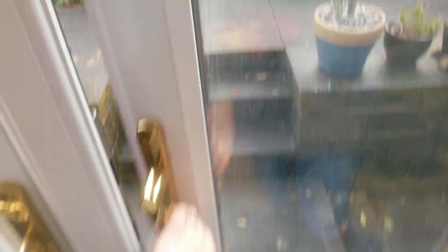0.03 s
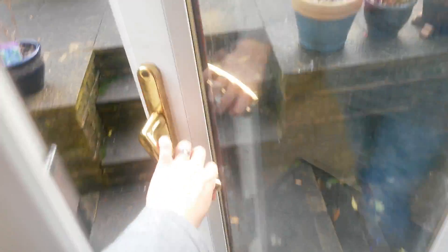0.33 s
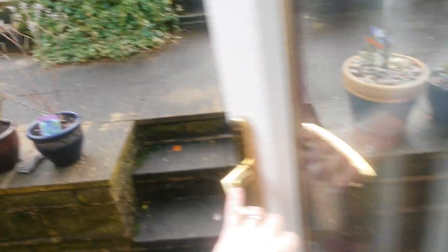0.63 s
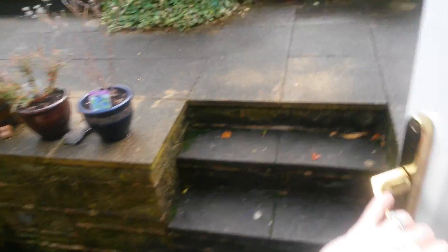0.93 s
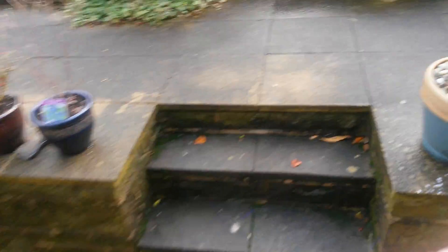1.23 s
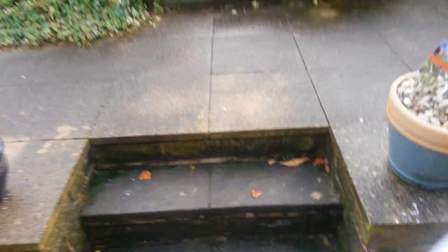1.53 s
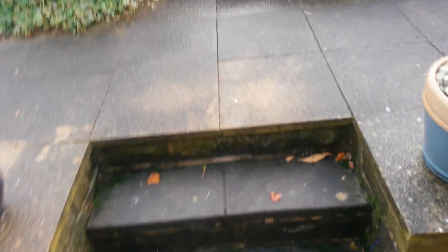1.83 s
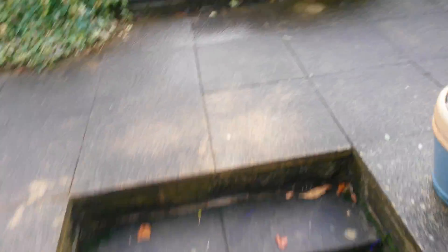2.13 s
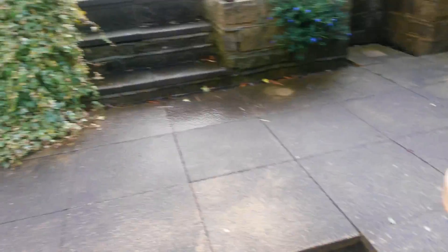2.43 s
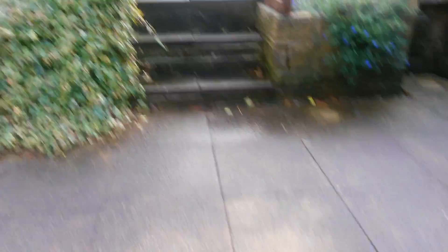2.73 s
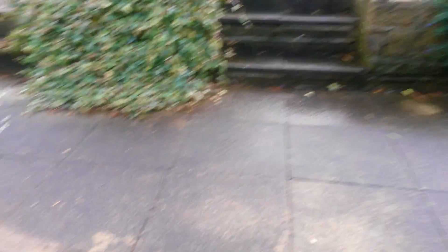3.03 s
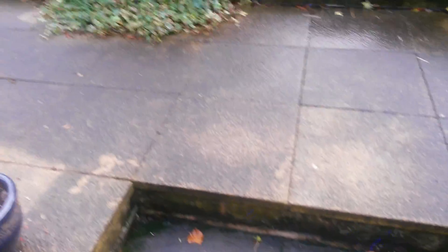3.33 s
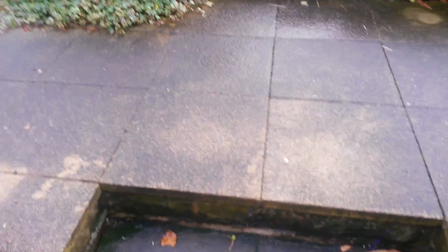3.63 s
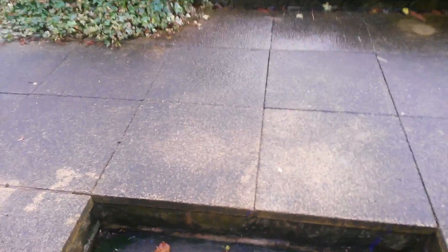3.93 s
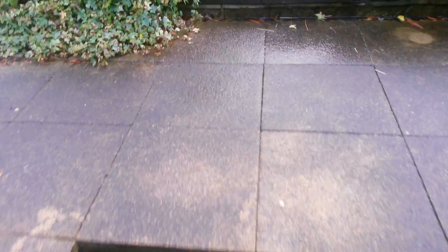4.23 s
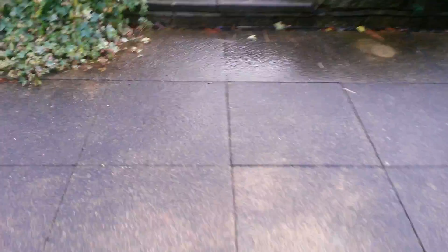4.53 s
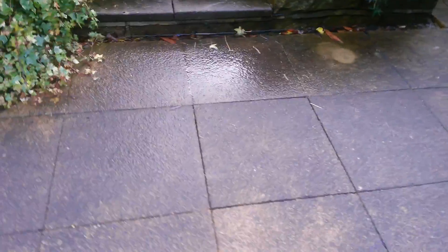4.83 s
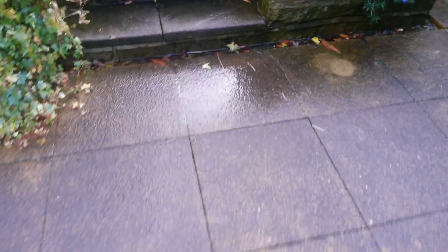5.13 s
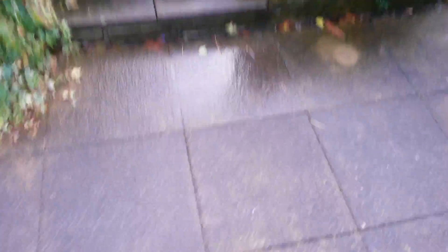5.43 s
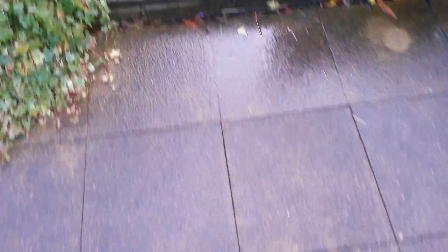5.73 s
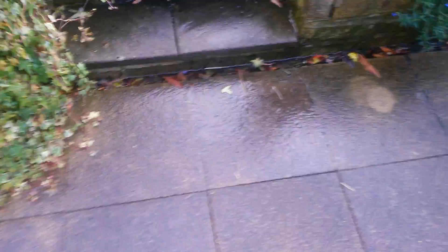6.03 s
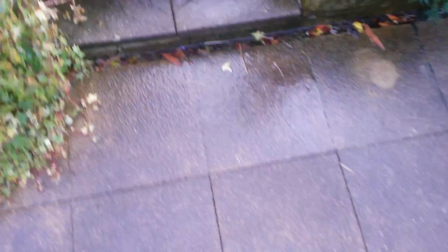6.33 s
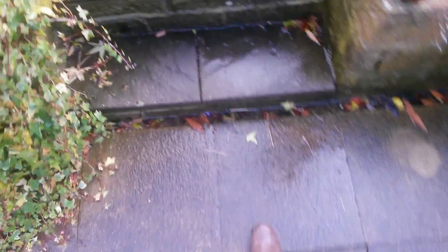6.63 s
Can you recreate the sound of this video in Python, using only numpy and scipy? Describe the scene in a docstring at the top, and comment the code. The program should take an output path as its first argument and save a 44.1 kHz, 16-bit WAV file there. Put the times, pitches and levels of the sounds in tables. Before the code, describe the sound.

A faint hiss of drizzle and rustling clothes fades in at about half a second, over a low distant rumble. A glass patio door opens with a faint squeak and soft bumps, and quiet footsteps pad onto wet paving until about 2 seconds, with a few small drop ticks. At about 3.2 seconds the door bangs shut behind the microphone, by far the loudest sound: the latch snaps, the panel booms and the rubber seal thuds, with a short outdoor echo. The metal latch and handle clack and rattle, dying away by about 4.2 seconds. Soft footsteps resume from 4.4 seconds until the end, near 7 seconds, with gritty scuffs, sleeve brushes and faint squeaks of wet soles. Two raindrops click sharply on the microphone, toward the left, at about 4.6 and 5.4 seconds. The light rain continues underneath.

```python
"""Someone steps out through a glass patio door onto wet paving in light rain, holding a camera.
First a faint hiss of drizzle and clothes fades in, the door swings open, and feet pad outside.
About three seconds in, the door bangs shut: the latch snaps, the panel booms, the rubber seal thuds.
For the next second the metal latch and handle clack and rattle as they settle.
Then come more soft steps, scuffs and squeaks of wet soles, while a few drops tick on the camera."""
import sys
import numpy as np
from scipy import signal
from scipy.fft import rfft, irfft
from scipy.io import wavfile
from scipy.ndimage import uniform_filter1d

SR = 44100
rng = np.random.default_rng(int(sys.argv[2]) if len(sys.argv) > 2 else 0)


def unload_audio(sound):
    """Save the sound as a 16-bit wav file, at the path given as the first command line argument."""
    columns = np.transpose(np.atleast_2d(sound))
    # keep every value between -1 and 1, then stretch to whole-number steps
    steps = np.round(np.clip(columns, -1, 1) * 32767)
    wavfile.write(sys.argv[1], SR, steps.astype(np.int16))


N = 298998
TIME = np.arange(N) / SR

# the door opening, then slamming and shaking: (time [s], level [dB], treble limit [Hz])
DOOR_BLOWS = [(0.71, -43, 646), (0.7182, -36, 280), (0.737, -31.5, 140), (1.359, -30.5, 263),
              (3.181, -30, 1740), (3.226, -26, 975), (3.2515, -14, 3730), (3.28, -12.5, 90),
              (3.3, -24.5, 300), (3.332, -24.5, 1510), (3.364, -30.5, 1900), (3.417, -41, 1100),
              (3.486, -32.5, 995), (3.514, -24.5, 152), (3.562, -42, 254), (3.606, -38, 263),
              (3.629, -47, 900)]
# the notes of the door panel and its glass: (pitch [Hz], level [dB], ring time [s])
PANEL_NOTES = [(28, -23, 0.37), (65.8, -13, 0.16), (109.2, 1, 0.15), (136.6, -20, 0.14), (182, -4, 0.22),
               (201.3, -15, 0.26), (247.2, -18.5, 0.65), (255, -17, 0.19), (328, -18, 0.77),
               (354, -6.5, 0.085), (468, -19.5, 0.54), (557, -26, 0.94), (646, 2, 0.054), (828, -25, 0.47),
               (849, -6.5, 0.26), (940, -14.5, 0.44), (1102, -12, 0.12), (1103, -17, 0.57),
               (1224, -10, 0.12), (1284, -21, 0.48), (1550, -12, 0.32), (1700, -31, 0.46)]
# the frame's many small vibrations, heard as noise: (frequency [Hz], level [dB])
FRAME_COLOUR = [(20, -22), (50, -24), (115, -3), (190, 0), (270, -0.5), (380, -4), (700, -3.5), (1200, -12),
                (2500, -11), (8000, -8), (15000, -37)]
def door(panel_db=-6, frame_db=-1, slam_ring_s=0.36, half_ring_db=34):
    """Each blow makes the panel boom and the frame shake; harder blows shake the frame longer."""
    out, t = np.zeros((2, N)), TIME[:SR]
    hardest_db = max(row[1] for row in DOOR_BLOWS)
    for s, db, treble_hz in DOOR_BLOWS:
        ring_s = slam_ring_s * 2 ** ((db - hardest_db) / half_ring_db)
        panel = amp(panel_db) * ring(PANEL_NOTES, t, path_s=0.00023)
        frame = amp(frame_db) * noise(FRAME_COLOUR, SR) * fade(t, ring_s)
        blow = (panel + frame) * (1 - fade(t, 0.012))
        add(out, s, amp(db) * cut_treble(blow, treble_hz, order=2))
    return out + amp(-11) * yard_echo(out)


# the door pressing into its seal: (time [s], level [dB], pitch [Hz], time to peak [cycles])
SEAL_THUDS = [(3.189, -34.5, 322, 1.7), (3.253, -14.5, 364, 0.46), (3.255, -15.5, 115, 0.7),
              (3.28, -29, 42, .6), (3.3, -20.5, 148, 0.6), (3.351, -33, 32, 0.53), (3.511, -36, 62, .9)]
def rubber_seal():
    """The rubber seal catches the closing door with dull thuds."""
    out = np.zeros((2, N))
    for s, db, hz, cycles in SEAL_THUDS:
        add(out, s, amp(db) * thump(hz, ring_s=0.16, rumble_db=-6.5, cycles=cycles))
    return out + amp(-17) * yard_echo(out)


# the notes of the hollow frame: (pitch [Hz], level [dB], ring time [s])
FRAME_NOTES = [(490, -1, 0.077), (548, 1, 0.042), (1017, -14, 0.055), (1385, -4, 0.024)]
def frame_knock(at_s=3.1825, level_db=-24):
    """The door's edge knocks on the hollow frame just before the slam."""
    out, t = np.zeros((2, N)), TIME[:SR // 4]
    knock = ring(FRAME_NOTES, t, path_s=0.00047) * (1 - fade(t, 0.0066))
    add(out, at_s, amp(level_db) * cut_treble(knock, 2500, order=2))
    return out + amp(-14) * yard_echo(out)


BOLT_S = 3.235
def latch_bolt(width_hz=2600):
    """The springy bolt hits its metal catch: a bright snap and a lower, longer ring."""
    out, t = np.zeros((2, N)), TIME[:SR // 10]
    for db, hz, ring_s in [(-21, 8400, 0.003), (-28, 2900, 0.12)]:
        metal = note_clusters([(hz, width_hz, 0)], len(t), vary_db=0)
        add(out, BOLT_S, amp(db) * metal * fade(t, ring_s))
    return out


# latch and handle hits: (time [s], level [dB], treble limit [Hz], bounce compared with hit [dB],
# rise time [s], boosted pitch [Hz])
LOCK_HITS = [(3.236, -30, 11200, -1, 0.0017, 7500), (3.2534, -21.5, 14400, -13, 0.0048, 7600),
             (3.291, -17, 8400, -8, 0.002, 6500), (3.3328, -31, 12500, 6.5, 0.0023, 7600),
             (3.3707, -15.5, 5900, 3, 0.0024, 4250), (3.4164, -22, 6300, 5.5, 0.0043, 6400),
             (3.484, -26.5, 6470, 6.5, 0.0031, 4200), (3.511, -28, 6750, 3.5, 0.0022, 4330),
             (3.5203, -29, 9400, 0, 0.00093, 7600), (3.543, -34.5, 6100, 6, 0.0025, 5370),
             (3.5534, -32.5, 6200, 5.5, .002, 4370), (3.6087, -44, 7700, -11, .001, 5340),
             (3.628, -32, 8600, -3, 0.0022, 5450), (3.7086, -42, 8640, -6, 0.0019, 6500),
             (3.745, -19, 8070, -5.5, 0.0015, 4750), (3.765, -31, 8000, -11, 0.0023, 6900),
             (3.814, -37, 8650, -4, 0.003, 6740), (3.8378, -23, 8600, -3, .002, 6500),
             (3.857, -34.5, 7700, -4, .002, 6500), (3.875, -42.5, 8350, -1, .002, 7450),
             (3.902, -46, 8100, -2, .002, 4400), (3.932, -49.5, 8900, -11, .002, 7600),
             (3.945, -51.5, 9700, -13, 0.00086, 7600), (4.1444, -39, 9900, 1, 0.0016, 7500),
             (4.1822, -37.5, 6600, 3, 0.0014, 4550), (4.199, -37, 9500, -6, 0.0023, 7500),
             (4.217, -36.5, 7900, -1.5, 0.0024, 7550)]
# the handle's spring being let go: (time [s], level [dB])
SPRING_RELEASES = [(3.747, -46), (3.838, -46.5), (4.149, -58.5), (4.199, -57.5)]
# the low notes of the spring and the panel that holds it: (pitch [Hz], level [dB], ring time [s])
SPRING_NOTES = [(65, -6, .7), (178, 0, 0.55), (189, -8, 0.4), (234, -6, 0.33), (328, -8, .4),
                (458, -12, .45)]
def lock_rattle(clack_ring_s=0.077, chatter_s=0.37, settle_s=0.021, bounce_s=0.0105, echo_s=0.015):
    """Each clack is followed by a duller bounce and an echo off the wall; the handle's spring hums."""
    out = np.zeros((2, N))
    for s, db, treble_hz, bounce_db, rise_s, boost_hz in LOCK_HITS:
        # hits close to the bolt's snap ring longer
        ring_s = clack_ring_s + chatter_s * np.exp(-abs(s - BOLT_S) / settle_s)
        hit = amp(db) * clack(treble_hz, ring_s, rise_s, boost_hz)
        bounce = clack(0.52 * treble_hz, ring_s, rise_s, boost_hz=3190, bite_db=-7.5)
        add(out, s, hit)
        add(out, s + bounce_s, amp(db + bounce_db) * bounce)
        add(out, s + echo_s, amp(-15) * hit[::-1])  # left and right swap
    for s, db in SPRING_RELEASES:
        add(out, s, amp(db) * ring(SPRING_NOTES, TIME[:SR]))
    return out + amp(-12) * yard_echo(out)


# the crack of the lock's case: (frequency [Hz], level [dB])
CASE_COLOUR = [(60, -37), (250, -14.5), (900, -7), (2000, -6), (2900, -12.5), (3700, -3), (4600, -4),
               (5700, -0.5), (6400, 2), (7800, 1), (9200, -3.5), (11000, -6.5), (14500, -16)]
# bunches of close notes in the lock's metal parts: (centre [Hz], width [Hz], level [dB])
METAL_CLUSTERS = [(2450, 130, -7.5), (2737, 240, -2), (3270, 510, -4), (3740, 200, -3), (4297, 215, 4),
                  (4530, 110, -0.5), (4850, 320, -1.5), (5220, 450, -2.5), (6324, 230, 5.5),
                  (6850, 400, -7), (7510, 270, 4.5), (8740, 220, 4), (10060, 400, -5)]
# the handle's clear notes: (pitch [Hz], level [dB], ring time [s])
HANDLE_NOTES = [(2270, -11, 0.3), (2730, -14.5, 0.22), (3210, -8.5, 0.14), (3850, -11, 0.22),
                (4190, -2, 0.27), (4440, -3.5, 0.3), (4600, -4, 0.2), (5350, -8.5, 0.4),
                (6150, -10.5, 0.17), (7470, -13, 0.22)]
def clack(treble_hz, ring_s, rise_s, boost_hz, bite_db=-2, bite_s=0.0059):
    """Metal parts collide in the lock: a rough crack, a brief chime and the handle's clear notes."""
    t = TIME[:SR // 3]
    crack = amp(-7) * noise(CASE_COLOUR, len(t)) * fade(t, ring_s)
    # the parts stay pressed together, so most of the chime dies with the crack
    chime_fade = amp(-5.5) * fade(t, ring_s) + amp(-19) * fade(t, 0.17)
    chime = note_clusters(METAL_CLUSTERS, len(t), vary_db=2.9, boost_hz=boost_hz) * chime_fade
    bite = 1 + amp(bite_db) * np.exp(-((t - rise_s) / bite_s) ** 2)  # a louder start
    chatter = roughness(len(t), depth_db=1.15, grain_samples=36)
    handle = amp(-23) * ring(HANDLE_NOTES, t, path_s=0.000475)
    hit = ((crack + chime) * bite * chatter + handle) * np.minimum(t / rise_s, 1)
    return cut_treble(hit, treble_hz, order=5)


def note_clusters(peaks, size, vary_db, boost_hz=0, boost_db=5, boost_width_hz=450):
    """Struck metal rings at many close pitches; each bunch's level varies by about vary_db."""
    hz = np.fft.rfftfreq(size, 1 / SR)
    power = 0
    for centre, width, db in peaks:
        strength = amp(db + vary_db * rng.standard_normal())
        power += (strength / (1 + ((hz - centre) / width * 2) ** 2)) ** 2
    boost = amp(boost_db * np.exp(-((hz - boost_hz) / boost_width_hz) ** 2))
    white = rfft(rng.standard_normal((2, size)))
    return unit(irfft(white * np.sqrt(power) * boost, size))


# feet landing: (time [s], thump level [dB], pitch [Hz], heel click [dB], grit [dB],
# toe compared with heel [dB])
FOOTFALLS = [(.709, -39.5, 550, -68, -61, -15), (1.248, -45.5, 455, -53, -58, -9),
             (1.295, -48, 387, -67, -60, -0.5), (1.357, -34, 126, -52, -68, -4),
             (1.384, -44, 400, -73, -72, -15), (1.432, -27.5, 383, -58, -70, -7),
             (1.453, -39.5, 540, -58, -67, -22), (1.572, -40.5, 295, -54, -60, -0.5),
             (1.916, -40, 254, -58.5, -62, -11), (2.029, -44, 506, -77, -81, 2.5),
             (4.4015, -35, 410, -57, -63, -5), (5.01, -42.5, 93, -74, -69, -13),
             (5.267, -26, 435, -64, -53, -18), (5.82, -45.5, 69.5, -75, -69, -8),
             (5.9143, -40.5, 373, -56, -67, -18), (5.9295, -43, 252, -51, -51.5, -1.5),
             (6.59, -42.5, 149, -65, -61, -7)]
# wet soles pressing flat: (time [s], level [dB], pitch [Hz])
SOLE_SQUASHES = [(4.403, -39, 164), (5.273, -31, 186), (5.2785, -34, 440), (5.9442, -36, 282),
                 (6.688, -47, 230)]
def footsteps(grit_delay_s=0.0058, toe_delay_s=0.017, toe_pitch_ratio=0.68):
    """The heel lands with a click, grit slides under the sole, and the foot rolls onto its toe."""
    out = np.zeros((2, N))
    for s, db, hz, click_db, grit_db, toe_db in FOOTFALLS:
        add(out, s, amp(db) * thump(hz, ring_s=0.078))
        add(out, s, amp(click_db) * rub(length_s=0.0045, centre_hz=4730, scrape_db=1.5))
        add(out, s + grit_delay_s, amp(grit_db) * rub(length_s=0.03, centre_hz=6500, scrape_db=-6))
        add(out, s + toe_delay_s, amp(db + toe_db) * thump(toe_pitch_ratio * hz, ring_s=0.11))
    for s, db, hz in SOLE_SQUASHES:
        add(out, s, amp(db) * thump(hz, ring_s=0.11))
    return out + amp(-17) * yard_echo(out)


def thump(hz, ring_s, rumble_db=-9, cycles=0.45):
    """A soft bump gives a quick push of air and a short rumble around the same pitch."""
    t = TIME[:SR // 2]
    age = t * hz / cycles
    push = -age * np.exp(1 - age ** 1.01) * np.sin(2 * np.pi * hz * t)
    rumble = noise([(hz / 5, -9), (hz, 0), (hz * 1.05, -5), (hz * 4, -25), (15000, -55)], len(t))
    return push + amp(rumble_db) * rumble * fade(t, ring_s) * (1 - fade(t, 0.0078))


# drops on the camera: (time [s], click level [dB], knock level [dB], left over right [dB])
DROP_HITS = [(0.752, -28.5, -43, 3), (0.815, -36, -58, 11), (1.525, -32, -36, 2), (1.7673, -27.5, -34, 2),
             (2.389, -29.5, -66, 16), (4.572, -12.5, -32, 13), (5.3905, -11, -35.5, 16.5),
             (5.495, -40, -35.5, 16)]
# the notes of the camera's shell: (pitch [Hz], level [dB], ring time [s])
SHELL_NOTES = [(780, -10, .011), (1150, -3, .01), (1800, -1, .008)]
def camera_drops(click_hz=6800, click_ring_s=0.0008):
    """A raindrop hits the camera: a dry click and a brief hollow knock from the shell."""
    out, t = np.zeros((2, N)), TIME[:SR // 20]
    for s, click_db, knock_db, side_db in DROP_HITS:
        click = cut_bass(ring([(click_hz, click_db, click_ring_s)], t), 3800, order=2)
        knock = cut_bass(amp(knock_db) * ring(SHELL_NOTES, t), 550, order=2)
        add(out, s, pan(side_db) * cut_treble(click + knock, 10500, order=4))
    return out


# strokes of soles and sleeves: (time [s], length [s], level [dB], scrape compared with swish [dB],
# left over right [dB], swish centre [Hz])
SCUFF_STROKES = [(1.452, 0.0026, -56, 8, 0, 5000), (1.763, 0.082, -55.5, -0.5, 0, 6530),
                 (2.374, 0.15, -62.5, -19, -3, 6900), (2.736, 0.28, -58, -11, -3, 6160),
                 (4.538, 0.02, -48.5, -24, -1, 6700), (4.608, 0.065, -51.5, -4.5, 1.5, 6500),
                 (5.277, 0.026, -41.5, -19, 0, 5330), (5.2783, 0.0017, -59, 7, 5, 5000),
                 (5.315, 0.032, -53, -25, -5, 7000), (5.334, 0.025, -45.5, -31, -11, 7600),
                 (5.373, 0.024, -44, -11, -9, 6200), (5.417, 0.0058, -51, -27, -12, 8400),
                 (5.453, 0.026, -49.5, -16, -21.5, 8100), (5.478, 0.03, -46.5, -7.5, -17, 7900),
                 (5.527, 0.045, -55, 1.5, -1, 5000), (5.58, 0.0035, -53, -1, -9, 5200),
                 (5.936, .004, -49, 3.5, -3, 5000), (6.193, 0.0042, -51.5, -6, 0, 4600),
                 (6.292, 0.0089, -53, -1, 2.5, 3600), (6.62, 0.051, -45, -5, -2, 6760),
                 (6.642, 0.048, -40, -5, -3, 6900), (6.7, 0.021, -45.5, -3.5, -4, 6500)]
def scuffs():
    """Soles drag and sleeves brush around the camera."""
    out = np.zeros((2, N))
    for s, length_s, db, scrape_db, side_db, centre_hz in SCUFF_STROKES:
        add(out, s, amp(db) * pan(side_db) * rub(length_s, centre_hz, scrape_db))
    return out


# the high swish of rubbing: (frequency [times the centre], level [dB])
SWISH_COLOUR = [(.03, -42.5), (.35, 1), (.5, 6), (.68, 9.5), (1.2, 10), (1.7, 1), (2.6, -18)]
# the lower scrape under it: (frequency [Hz], level [dB])
SCRAPE_COLOUR = [(60, 1), (250, 11), (520, 6), (750, 4), (1000, 5), (1500, 7), (3000, 2), (8000, -57)]
def rub(length_s, centre_hz, scrape_db):
    """Gritty rubbing that catches quickly and slides to a stop."""
    t = TIME[:SR // 2]
    grit = roughness(len(t), depth_db=1, grain_samples=40)
    swish = noise([(ratio * centre_hz, db) for ratio, db in SWISH_COLOUR], len(t))
    scrape = amp(scrape_db) * noise(SCRAPE_COLOUR, len(t))
    stroke = (1 - fade(t, 0.047 * length_s)) * np.exp(-(t / length_s) ** 2)
    return (swish + scrape) * grit * stroke


# faint squeaks of the door seal and wet soles: (time [s], length [s], level [dB], first pitch [Hz],
# middle pitch [Hz], last pitch [Hz], width [Hz])
SQUEAK_GLIDES = [(0.48, 0.6, -67.5, 1317, 1350, 1453, 220), (1.56, 0.071, -62.5, 2410, 2310, 2090, 300),
                 (4.872, 0.07, -59.5, 2270, 2610, 1950, 150), (6.29, 0.125, -58.5, 1680, 1593, 910, 523),
                 (6.615, .05, -47, 574, 495, 590, 202), (6.649, 0.055, -47.5, 790, 1040, 980, 380)]
def squeaks():
    """Rubbing makes one breathy note that slides along a curve through three pitches."""
    out = np.zeros((2, N))
    for s, length_s, db, *pitches, width_hz in SQUEAK_GLIDES:
        progress = np.linspace(0, 1, round(length_s * SR))
        hz = np.polyval(np.polyfit([0, .5, 1], pitches, 2), progress)
        flutter = cut_treble(rng.standard_normal((2, len(progress))), width_hz / 2, order=2)
        phase = 2 * np.pi * np.cumsum(hz) / SR
        note = unit(flutter[0] * np.cos(phase) + flutter[1] * np.sin(phase))
        add(out, s, amp(db) * note * np.sin(np.pi * progress))
    return out


# the far rumble: (frequency [Hz], level [dB])
RUMBLE_COLOUR = [(20, -7), (45, -7), (66, 6.5), (95, -4.5), (170, -6.5), (350, -10), (600, -15.5),
                 (1200, -24), (3000, -34.5)]
# the background hiss of drizzle and rustling clothes: (frequency [Hz], level [dB])
HISS_COLOUR = [(100, -41), (700, 3.5), (1500, 3), (2500, 3.5), (4400, 3), (6000, 3.5), (8000, 4),
               (9500, -1), (12000, 0.5), (14500, -7)]
# the rumble's loudness, in one list before the slam and one after: (time [s], relative level [dB])
RUMBLE_LEVELS = [
    [(0.55, -69), (0.76, -61), (2.36, -60), (3.12, -60)],
    [(4.0, -63.5), (5.64, -60), (6.49, -65.5), (6.78, -56)],
]
# the same for the hiss, swelling with movement and dipping after the slam: (time [s], relative level [dB])
HISS_LEVELS = [
    [(0.55, -70), (0.61, -66.5), (0.82, -60.5), (1.08, -62.5), (1.2, -66), (1.29, -64), (1.42, -60.5),
     (1.6, -59), (1.7, -66), (1.96, -65.5), (2.18, -64.5), (2.32, -63), (3.12, -65)],
    [(4.0, -65.5), (4.35, -67), (4.46, -65.5), (4.73, -63), (5.15, -61.5), (5.26, -65), (5.4, -59),
     (5.54, -58), (5.73, -59.5), (5.8, -63), (5.89, -65), (5.98, -61), (6.14, -66.5), (6.22, -62.5),
     (6.36, -64), (6.45, -68), (6.55, -62.5), (6.78, -60)],
]
def background(rumble_db=2, hiss_db=5, patter_db=-17, drops_per_s=60, waver_db=1.37):
    """A far rumble, the hiss of drizzle and rustling clothes, and fine drops landing on the stone."""
    rumble_gain = amp(rumble_db + np.interp(TIME, *np.concatenate(RUMBLE_LEVELS).T))
    hiss_gain = amp(hiss_db + np.interp(TIME, *np.concatenate(HISS_LEVELS).T))
    rumble = noise(RUMBLE_COLOUR, N)
    landings = (rng.random((2, N)) < drops_per_s / SR) * rng.exponential(1, (2, N))
    splash = noise(HISS_COLOUR, 512) * fade(TIME[:512], .008)
    patter = unit(signal.oaconvolve(landings, splash, axes=1)[:, :N])
    hiss = (noise(HISS_COLOUR, N) + amp(patter_db) * patter) * amp(waver_db * waver(top_hz=22))
    return rumble * rumble_gain + hiss * hiss_gain


# how long the yard echoes: (frequency [Hz], ring time [s])
ECHO_TIMES = [(60, 0.49), (250, 0.58), (1000, 0.41), (4000, 0.12), (8000, 0.26), (14000, 0.2)]
def yard_echo(x):
    """Sound bounces off the house wall, steps and paving; the treble dies before the bass."""
    hz, t, bands = signal.stft(noise([(20, 0), (15000, 0)], SR), SR, nperseg=256)
    bands = bands * fade(t, look_up(ECHO_TIMES, hz)[:, None]) * (1 - fade(t, 0.026))
    tail = signal.istft(bands, SR, nperseg=256)[1]
    return signal.fftconvolve(x, tail / np.linalg.norm(tail[0]), axes=1)[:, :N]


# how alike the left and right sides are: (frequency [Hz], likeness [-1 to 1])
SIDE_LIKENESS = [(60, 0.88), (350, 0.89), (750, 0.39), (1500, -0.18), (3000, 0.046), (14000, -0.096)]
def noise(colour, size):
    """Stereo noise, alike on both sides in the bass; its colour sets the level at each frequency."""
    hz = np.fft.rfftfreq(size, 1 / SR)
    a, b = rfft(rng.standard_normal((2, size)))
    same = look_up(SIDE_LIKENESS, hz)
    mid, side = a * np.sqrt(1 + same), b * np.sqrt(1 - same)
    return unit(irfft(np.array([mid + side, mid - side]) * amp(look_up(colour, hz)), size))


def ring(notes, t, path_s=0):
    """Fading notes of a struck object; each reaches the two ears up to path_s apart."""
    return sum(amp(db) * fade(t, ring_s) * np.sin(2 * np.pi * hz * (t + path_s * rng.random((2, 1))))
               for hz, db, ring_s in notes)


def roughness(size, depth_db, grain_samples):
    """A fast random flicker in loudness."""
    return amp(depth_db * unit(uniform_filter1d(rng.standard_normal(size), grain_samples)))


def waver(top_hz):
    """A slow random drift."""
    hz = np.fft.rfftfreq(N, 1 / SR)
    return unit(irfft(rfft(rng.standard_normal(N)) * np.exp(-(hz / top_hz) ** 2), N))


def fade(t, ring_s):
    """Falls by 60 dB in the ring time."""
    return np.exp(-np.log(1000) * t / ring_s)


def cut_treble(x, hz, order):
    """A softer hit makes less treble."""
    return signal.sosfilt(signal.butter(order, hz, fs=SR, output="sos"), x)


def cut_bass(x, hz, order):
    """Small things give off little bass."""
    return signal.sosfilt(signal.butter(order, hz, "high", fs=SR, output="sos"), x)


def amp(db):
    """Turns decibels into a multiplier."""
    return 10 ** (np.asarray(db) / 20)


def unit(x):
    """Scales to an average strength (rms) of 1."""
    return x / np.sqrt(np.mean(x ** 2) + 1e-20)


def look_up(points, hz):
    """Reads between (frequency, value) points, with octaves evenly spaced."""
    known_hz, values = np.transpose(points)
    return np.interp(np.log(hz + 1), np.log(known_hz + 1), values)


def add(mix, s, sound):
    """Mixes a sound in at s seconds."""
    part = mix[:, round(s * SR):][:, :sound.shape[-1]]
    part += sound[..., :part.shape[1]]


def pan(db):
    """Two multipliers that make the left side db louder than the right."""
    return amp(np.array([[.5], [-.5]]) * db)


def pan_by_pitch(x, points):
    """Gives each frequency its own left-right balance."""
    return irfft(rfft(x) * pan(look_up(points, np.fft.rfftfreq(N, 1 / SR))), N)


# the balance of sound from behind: (frequency [Hz], left over right [dB])
BEHIND_BALANCE = [(3000, -1), (8200, 2), (9500, 3), (11500, -18), (14000, -4)]
def scene():
    """The door is behind the camera; everything else is near or all around."""
    behind = pan_by_pitch(door() + latch_bolt() + lock_rattle(), BEHIND_BALANCE)
    doorway = behind + frame_knock() + rubber_seal()
    return doorway + footsteps() + camera_drops() + scuffs() + squeaks() + background()


# the balance of the two microphone openings: (frequency [Hz], left over right [dB])
MIC_BALANCE = [(100, -0.5), (1000, 0), (2400, 4), (3400, 0), (4400, 5), (5600, 3), (6400, 2.5), (7200, -2),
               (8200, -9), (9000, -2.5), (10000, -5), (12000, 4)]
FADE_IN_S, TOP_HZ = (0.37, 0.49), 14750
def record(dry):
    """The microphone tilts the balance, fades in, and drops the highest treble."""
    heard = pan_by_pitch(dry, MIC_BALANCE) * np.interp(TIME, FADE_IN_S, (0, 1))
    treble_filter = signal.firwin(511, TOP_HZ, window=("kaiser", 9), fs=SR)
    return signal.oaconvolve(heard, treble_filter[None], "same")


dry = scene()
out = record(dry)
unload_audio(out)
```